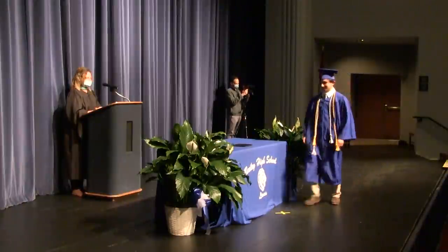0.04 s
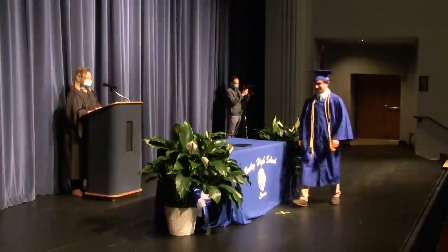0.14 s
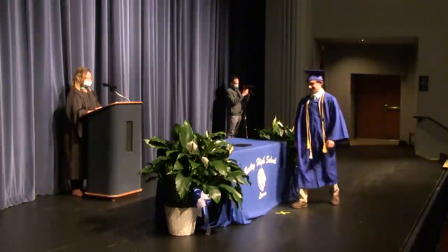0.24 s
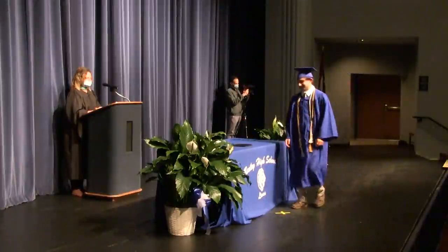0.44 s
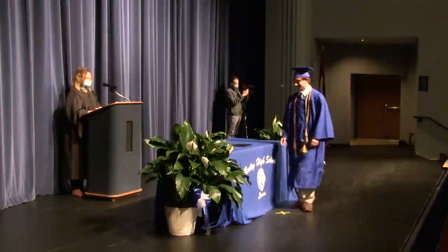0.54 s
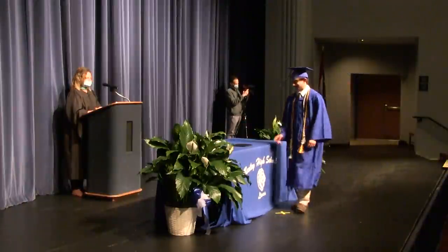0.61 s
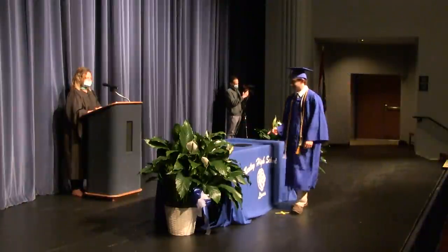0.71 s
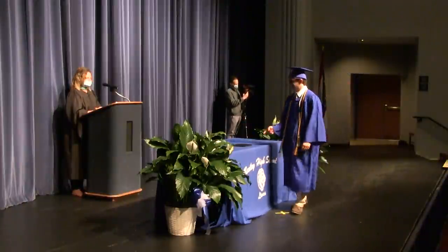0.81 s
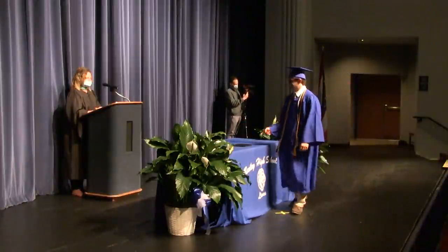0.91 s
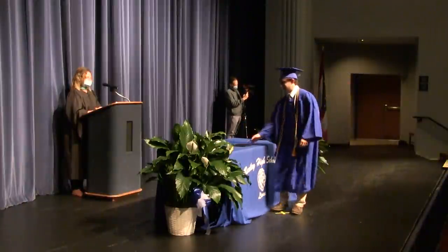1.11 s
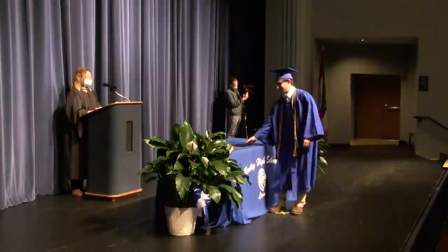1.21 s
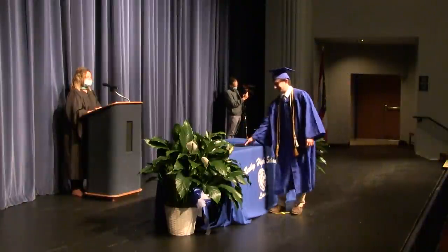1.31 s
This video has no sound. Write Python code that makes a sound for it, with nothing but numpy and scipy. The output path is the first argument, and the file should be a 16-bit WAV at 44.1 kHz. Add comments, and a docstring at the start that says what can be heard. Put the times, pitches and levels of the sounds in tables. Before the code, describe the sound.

A rubber shoe sole gives one high, falling squeak out of a brief scuff on a hard stage floor. The large hall rings briefly, and a light step follows a second later over a low ventilation rumble.

```python
"""Over a low ventilation rumble, a rubber sole scuffs a hard stage floor, chirps, then squeaks once
with a falling pitch; a light step follows a second later. Sliding friction makes the scuff, and
stick-slip, the rubber catching and letting go, makes the chirps and the squeak. The boards knock
under the foot. A wall throws the squeak back and a large hall rings on."""
import sys
import numpy as np
from scipy import signal
from scipy.fft import rfft, irfft
from scipy.io import wavfile
from scipy.ndimage import uniform_filter1d

SR = 44100
rng = np.random.default_rng(int(sys.argv[2]) if len(sys.argv) > 2 else 0)


def transcribe(u):
    """Save the signal u as a 16-bit wav file named by the first command-line argument.

    u: samples, shape (n,) or (channels, n), limited to [-1, 1]; the rate is SR.
    q: integer samples, one column per channel.
    """
    v = np.clip(np.atleast_2d(u).T, -1, 1)
    q = np.round(v * 32767).astype(np.int16)
    wavfile.write(sys.argv[1], SR, q)


N = 59535
TIME = np.arange(N) / SR


def gain_of(db):
    return 10 ** (np.asarray(db) / 20)


def unit_rms(x):
    return x / np.sqrt(np.mean(x ** 2) + 1e-20)


def at_frequency(rows, hz, column=1):
    """One column of a table, interpolated over log frequency."""
    return np.interp(np.log(hz + 1), np.log([r[0] + 1 for r in rows]), [r[column] for r in rows])


def curve(rows, column):
    """One column of a table, interpolated over time."""
    return np.interp(TIME, [r[0] for r in rows], [r[column] for r in rows])


def envelope(rows, column=1):
    """A column in dB as a gain over time, silent outside the table's span."""
    return gain_of(curve(rows, column)) * ((TIME >= rows[0][0]) & (TIME <= rows[-1][0]))


def drift(seconds):
    """Smooth random wobble of rms 1."""
    size = max(int(seconds * SR), 1)
    return unit_rms(uniform_filter1d(uniform_filter1d(rng.standard_normal(N), size), size))


def noise(spectrum):
    """Spectrally shaped noise of rms 1."""
    shape = gain_of(at_frequency(spectrum, np.fft.rfftfreq(N, 1 / SR)))
    return unit_rms(irfft(rfft(rng.standard_normal(N)) * shape, N))


# Rumble and hiss. Each row: frequency in Hz, relative spectral density in dB.
AIR_SPECTRUM = [(12, -52.5), (25, -21.5), (54, -0.5), (90, -3), (118, -13), (150, -2.5), (205, -7.5),
                (235, -10), (404, -14.5), (500, -15), (1230, -25.5), (2470, -34.5), (5000, -43),
                (11500, -50), (12300, -60), (15500, -81)]
# Low hums. Each row: frequency in Hz, bandwidth in Hz, level in dB.
HUM_BANDS = [(65, 16, -65.5), (156.6, 12, -68), (199.6, 2.7, -64.5), (405.4, 8, -74.5)]

def ventilation():
    """Broadband rumble and hiss, a faint fading wash, and hums that waver by random modulation."""
    air = gain_of(-56.5 + 0.27 * drift(0.24)) * noise(AIR_SPECTRUM)
    wash_db, wash_t60_s = -73, 0.87
    wash = noise([(200, -40), (1500, 0), (11000, -20), (12300, -40)])
    air += gain_of(wash_db - 60 * TIME / wash_t60_s) * wash
    for hz, width_hz, db in HUM_BANDS:
        waver_s = 1 / width_hz / 2
        phase = 2 * np.pi * hz * TIME
        air += gain_of(db) * (drift(waver_s) * np.cos(phase) + drift(waver_s) * np.sin(phase))
    return air


# Early reflections. Each row: delay in seconds, gain before absorption in dB.
REFLECTIONS = [(.0085, -13), (0.021, -12), (.0262, -5), (.041, -16), (.053, -17)]

def wall_echoes(source):
    """Reflection returns delayed copies, dulled by absorption at walls and curtains."""
    response = np.zeros(SR // 10)
    for delay, db in REFLECTIONS:
        response[round(delay * SR)] += gain_of(db)
    dulled = signal.lfilter(*signal.butter(1, 2550, fs=SR), response)
    return signal.fftconvolve(source, dulled)[:N]


# The hall's tail. Each row: frequency in Hz, 60 dB decay time in seconds, relative level in dB.
HALL_BANDS = [(200, .8, -1.5), (900, 0.36, 3), (1600, 0.92, 2), (2690, 0.92, 1.5), (3750, 0.45, -4.5),
              (5364, .52, 1.5), (7974, 0.41, -3.5), (12000, .18, -2)]

def hall_reverberation(source):
    """A diffuse field builds up, then each band decays at its own rate, faster late in the tail."""
    tail_db, onset_s, build_s, late_loss_db_per_s2 = -7.5, 0.011, 0.079, 24.5
    hz, t, bands = signal.stft(rng.standard_normal(SR), SR, nperseg=256)
    t60 = at_frequency(HALL_BANDS, hz, column=1)[:, None]
    colour_db = at_frequency(HALL_BANDS, hz, column=2)[:, None]
    equal_energy = np.sqrt(np.log(1000) * 2 / SR / t60)  # a longer decay starts lower
    band_db = colour_db - 60 * t / t60 - late_loss_db_per_s2 * t ** 2
    tail = signal.istft(bands * equal_energy * gain_of(band_db), SR, nperseg=256)[1]
    build_up = np.clip((np.arange(len(tail)) / SR - onset_s) / build_s, 0, 1)
    return signal.fftconvolve(source, gain_of(tail_db) * build_up * tail)[:N]


# Floorboard modes. Each row: start in seconds, frequency in Hz, peak in dB, 60 dB decay in seconds.
BOARD_MODES = [(.186, 328.3, -48, 0.066), (0.223, 189.5, -53, .15), (1.242, 184, -44, 0.075),
               (1.250, 388, -51, 0.043), (1.308, 170, -46, 0.13)]

def board_knocks():
    """Boards struck by the foot vibrate freely as damped sinusoids."""
    knocks = np.zeros(N)
    for start, hz, db, t60 in BOARD_MODES:
        age = np.maximum(TIME - start, 0)
        knocks += gain_of(db - 60 * age / t60) * np.sin(2 * np.pi * hz * age)
    return knocks


# The later step's brush. Each row: time in seconds, level in dB.
BRUSH_LEVELS = [(1.246, -81), (1.262, -79), (1.267, -67), (1.275, -64), (1.280, -81), (1.297, -74),
                (1.32, -90.5)]
# Its colour. Each row: frequency in Hz, relative spectral density in dB.
BRUSH_SPECTRUM = [(1500, -32), (3200, -14.5), (4200, -18), (7200, -14), (13500, -24), (15500, -52)]

def step_brush():
    """Light friction of the sole gives a brief, high band of noise."""
    return noise(BRUSH_SPECTRUM) * envelope(BRUSH_LEVELS)


# The sliding sole. Each row: time in seconds, level before tilt in dB, treble tilt in dB per octave.
SCUFF_PATH = [(.1853, -75.5, -5), (.1860, -36.5, -6), (.1885, -43, -2), (.192, -40.5, -1.5),
              (.203, -47.5, 0.5), (.211, -44.5, 1), (.228, -43, 0.5), (.234, -42.5, 1.5), (.245, -41, -4),
              (.256, -43.5, -1), (.262, -51, -5), (.285, -45, -9), (.32, -55.5, -23), (.36, -68, -24)]
# Its colour before tilt. Each row: frequency in Hz, relative spectral density in dB.
SCUFF_SPECTRUM = [(100, -19.5), (300, -13.5), (450, -17.5), (620, -24), (780, -10.5), (1100, -12),
                  (1500, -16.5), (1800, -23.5), (3200, -8), (4400, -17), (7000, -18), (11500, -29.5),
                  (15500, -48)]

def sole_scuff():
    """Sliding friction makes gritty noise whose treble closes as the sole slows."""
    tilt_from_hz, grit_db = 2000, 3
    hz, t, bands = signal.stft(noise(SCUFF_SPECTRUM), SR, nperseg=128)
    tilt = np.interp(t, TIME, curve(SCUFF_PATH, column=2))
    octaves = np.log2(np.maximum(hz, tilt_from_hz) / tilt_from_hz)[:, None]
    rubbing = signal.istft(bands * gain_of(octaves * tilt), SR, nperseg=128)[1][:N]
    return rubbing * envelope(SCUFF_PATH) * gain_of(grit_db * drift(0.0014))


# Catches of the rubber. Each row: start in seconds, length in seconds, pitch in Hz, peak in dB.
RUBBER_CATCHES = [(.187, .010, 3160, -35), (.190, .007, 3825, -35.5), (0.191, .008, 2215, -37.5),
                  (.209, .006, 3650, -33.5), (0.216, .007, 3780, -39), (.2205, .005, 3118, -24.5),
                  (0.2232, .004, 3290, -30), (0.228, 0.0045, 3047, -40.5)]

def rubber_chirps():
    """Short bursts of stick-slip give smoothly windowed tones before the rubber sings."""
    chirps = np.zeros(N)
    for start, length, hz, db in RUBBER_CATCHES:
        age = TIME - start
        window = np.sin(np.pi * np.clip(age / length, 0, 1)) ** 2
        chirps += gain_of(db) * window * np.sin(2 * np.pi * hz * age)
    return chirps


# The squeak. Each row: time in seconds, pitch in Hz, fundamental's level in dB, overtone boost in dB.
SQUEAK_GLIDE = [(.2350, 2973, -54.5, -6.5), (.2362, 2970, -26.5, -6), (.2378, 2946, -17, 0.5),
                (.243, 2820, -16, -0.5), (.2475, 2722, -17.5, 0.5), (.251, 2664, -19, -0.5),
                (.2545, 2607, -22, 5.5), (.2565, 2557, -26, 8.5), (.260, 2480, -41, 9.5),
                (.263, 2450, -90.5, 7)]
# Its overtones. Each row: harmonic number, relative level in dB, flutter depth as a fraction.
SQUEAK_HARMONICS = [(2, -15, 0.3), (3, -22, 0.5), (4, -30, .4), (5, -44, .5)]
# What the sole favours among the overtones. Each row: frequency in Hz, gain in dB.
SOLE_RESPONSE = [(4800, -1), (5300, 1.5), (5700, -1), (6100, 0), (7500, -4.5), (8350, 3.5), (9000, -3),
                 (10300, -4), (11300, 2), (12200, -0.5), (15000, -0.5)]

def rubber_squeak():
    """Stick-slip oscillation: a near sine whose pitch falls and overtones harden as the sole slows."""
    rate_jitter, wander_turns = 0.011, 0.03
    pitch_hz, boost_db = curve(SQUEAK_GLIDE, column=1), curve(SQUEAK_GLIDE, column=3)
    turns = np.cumsum(pitch_hz * (1 + rate_jitter * drift(0.0012))) / SR
    tone = np.sin(2 * np.pi * turns)
    for harmonic, db, flutter in SQUEAK_HARMONICS:
        amplitude = gain_of(db + boost_db + at_frequency(SOLE_RESPONSE, harmonic * pitch_hz))
        amplitude *= 1 + flutter * drift(0.00079)
        overtone_turns = harmonic * (turns + wander_turns * drift(0.0008))  # higher ones smear more
        tone += amplitude * np.sin(2 * np.pi * (overtone_turns + rng.random()))
    return np.sqrt(2) * tone * envelope(SQUEAK_GLIDE, column=2)


def scene():
    """Superposition of the shoe's direct sound, its reflections and the background, in mono."""
    shoe = rubber_squeak() + rubber_chirps() + sole_scuff() + step_brush() + board_knocks()
    return (shoe + wall_echoes(shoe) + hall_reverberation(shoe) + ventilation())[None]


def record(dry):
    """Band limiting: a steep low-pass filter removes the highest treble."""
    low_pass = signal.firwin(511, cutoff=15650, window=("kaiser", 9), fs=SR)
    return signal.oaconvolve(dry, low_pass[None], "same")


dry = scene()
out = record(dry)
transcribe(out)
```